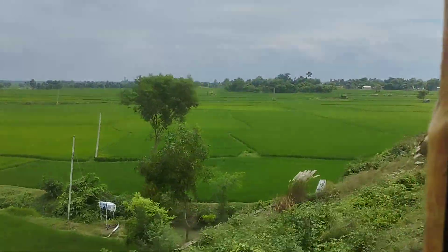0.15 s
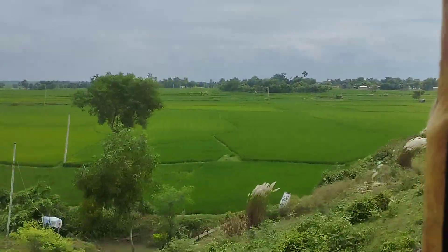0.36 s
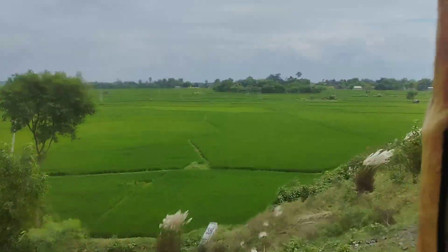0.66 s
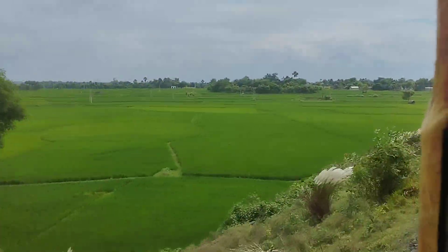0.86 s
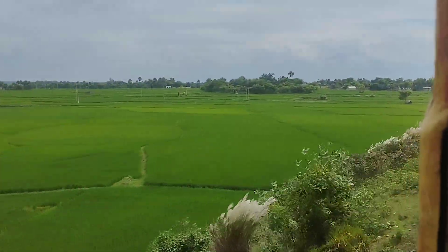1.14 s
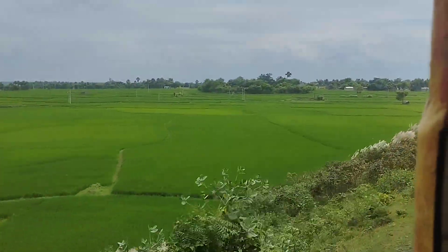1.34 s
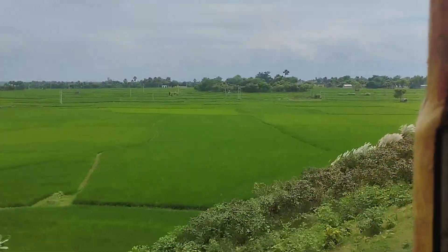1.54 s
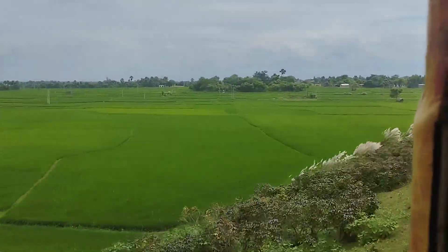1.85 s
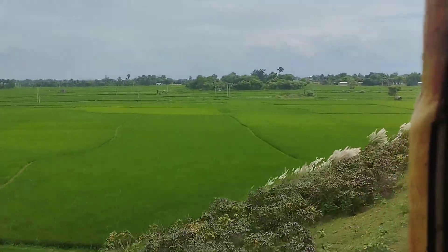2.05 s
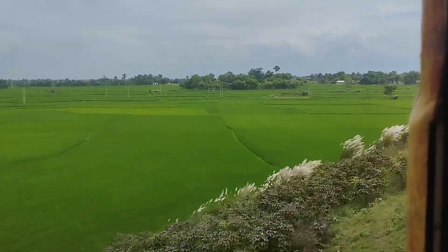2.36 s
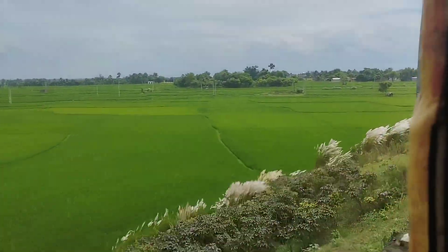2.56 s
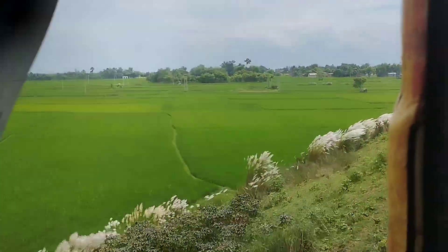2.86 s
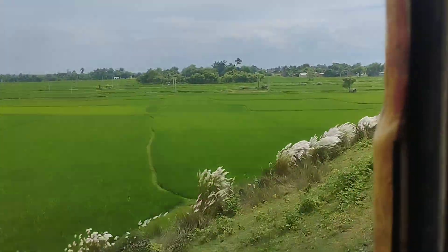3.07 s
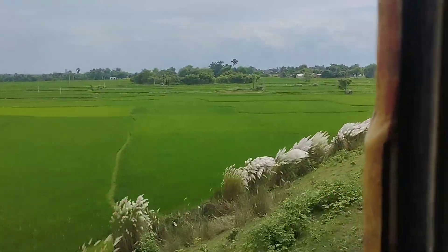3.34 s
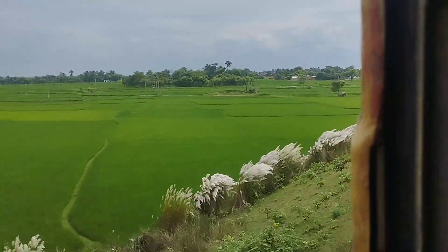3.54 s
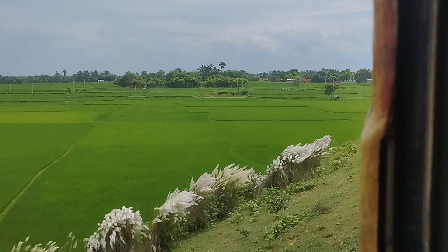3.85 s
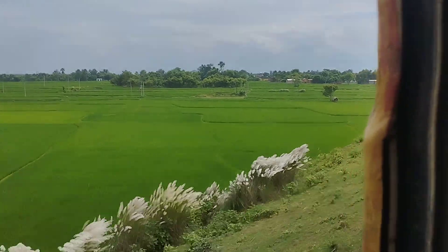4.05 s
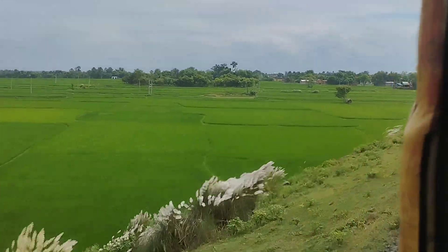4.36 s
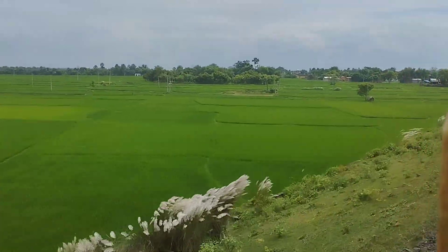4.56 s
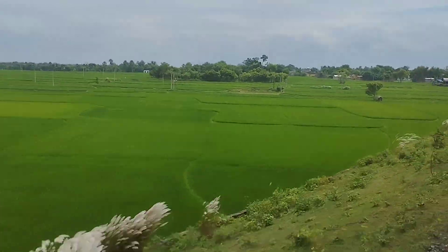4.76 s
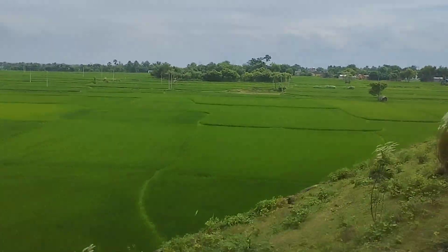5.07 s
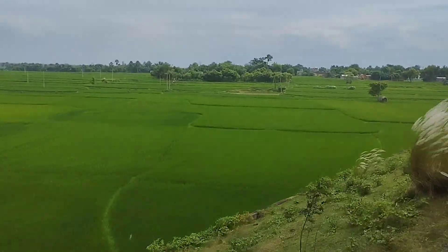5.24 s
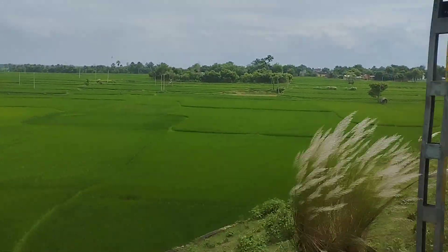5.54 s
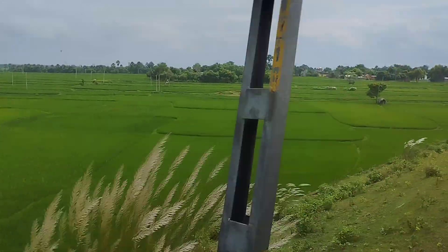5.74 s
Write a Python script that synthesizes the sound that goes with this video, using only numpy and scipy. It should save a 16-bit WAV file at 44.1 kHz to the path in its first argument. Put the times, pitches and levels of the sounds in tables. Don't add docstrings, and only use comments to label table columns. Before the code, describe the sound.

A close, clipped stereo capture of wind on a train passing green fields. Gusts flap and slam many times a second, harshest on the left with spitting bursts, milder buffeting on the right. Deep carriage throb and body rumble continue underneath, with a thin gear whine and rail hiss mostly buried. It starts abruptly at full strength, varies slightly, and never stops.

```python
import sys
import numpy as np
from scipy import signal
from scipy.fft import rfft, irfft, next_fast_len
from scipy.io import wavfile
from scipy.ndimage import uniform_filter1d, map_coordinates

SR = 44100
rng = np.random.default_rng(int(sys.argv[2]) if len(sys.argv) > 2 else 0)


def volts_from_decibels(level):
    exponent = np.asarray(level, float) / 20
    return 10 ** exponent


def transcribe(u):
    v = np.clip(np.atleast_2d(u).T, -1, 1)
    q = np.round(v * 32767).astype(np.int16)
    wavfile.write(sys.argv[1], SR, q)


N = 260278

# start_s, spit_db, fizz_re_spit_db, swell_db
EDDIES = [(0.063, -22.5, -31, -10), (0.134, -33.5, -33, -27), (0.167, -26, -34, -12.5),
          (0.229, -19, -26.5, -4), (0.288, -29, -28, -7.5), (0.343, -22.5, -22, -12.5),
          (0.379, -42, -25.5, -22.5), (0.403, -23.5, -28.5, -10.5), (0.453, -19, -25, -8.5),
          (0.508, -24.5, -34.5, -15.5), (0.558, -21, -27.5, -13.5), (0.603, -31, -31.5, -12),
          (0.62, -29.5, -30, -24), (0.667, -28.5, -32, -20), (0.726, -26.5, -28.5, -12.5),
          (0.793, -20, -33, -16), (0.841, -28, -24.5, -18.5), (0.883, -22, -30, -20),
          (0.915, -22, -26, -16), (1.028, -25.5, -35.5, -10.5), (1.083, -28, -33.5, -11),
          (1.127, -26, -25.5, -11.5), (1.185, -21, -18.5, -11), (1.207, -34, -37, -18),
          (1.243, -21.5, -24, -15), (1.302, -41, -36, -15), (1.396, -25, -33.5, -7),
          (1.45, -26, -31.0, -14.5), (1.508, -25, -30, -15), (1.573, -18.5, -11.5, -16.5),
          (1.632, -19.5, -21, -9), (1.679, -31.5, -35.0, -15), (1.732, -26, -29, -7),
          (1.787, -32, -35, -11.5), (1.853, -25.5, -37, -15.5), (1.914, -25.5, -33.5, -11),
          (1.968, -27.5, -38, -15), (1.997, -29.5, -26.5, -12.5),
          (2.027, -36.5, -34, -10.5), (2.112, -23.5, -29.5, -11.5), (2.145, -22.5, -26, -12.5),
                 (2.214, -35.5, -31.5, -18), (2.276, -34.5, -33, -10), (2.323, -16, -24, -12.5),
                 (2.374, -24, -18.5, -7.5), (2.419, -20.5, -27, -14.5), (2.45, -35.5, -31, -13.5),
                 (2.48, -34, -35.5, -9.5), (2.517, -34.5, -30.5, -10.5), (2.57, -29.5, -28.5, -13.5),
                 (2.611, -30.5, -24, -26), (2.645, -24.5, -33, -14.5), (2.71, -26, -30, -13.5),
                 (2.793, -38, -30.5, -21), (2.819, -20, -25.5, -16.5), (2.852, -36.5, -28.5, -18.5),
                 (2.895, -28.5, -28.0, -18.5), (2.923, -27.5, -37.5, -18), (3.062, -25, -40, -13.5),
                 (3.1, -28.5, -31.5, -10.5), (3.14, -38.5, -23.5, -16.5), (3.161, -20.5, -25.5, -11.5),
                 (3.224, -23.5, -31, -19), (3.27, -28.5, -27, -9), (3.295, -35.5, -32, -13),
                 (3.324, -32, -29, -21), (3.38, -32, -31.5, -19), (3.453, -22, -26, -18),
                 (3.475, -31.5, -32.5, -13), (3.503, -28.5, -26.5, -12), (3.523, -26.5, -25, -15.5),
                 (3.565, -24, -33, -14), (3.595, -27.5, -32, -8.5), (3.741, -28, -39.5, -22.5),
                 (3.84, -29, -31, -11.5), (3.892, -36.5, -35, -17), (3.949, -27.5, -40, -12),
                 (3.994, -35, -31, -16),
          (4.014, -41, -24.5, -18), (4.069, -31, -21.5, -21.5), (4.11, -32.5, -30.5, -15),
               (4.142, -26, -37.5, -9), (4.186, -28, -37, -16.5), (4.246, -21, -28, -19.5),
               (4.305, -23.5, -22, -12.5), (4.35, -19, -30, -16), (4.408, -23, -24.5, -20.5),
               (4.469, -29, -26, -16.5), (4.486, -35, -34.5, -25.5), (4.509, -31.5, -38, -15.5),
               (4.532, -36, -24.5, -20.5), (4.565, -23, -24.5, -15.5), (4.6, -28, -36, -13.5),
               (4.635, -28.5, -27.5, -11.5), (4.661, -29, -25.5, -14.5), (4.695, -28.5, -35, -12),
               (4.719, -40.5, -33.5, -17.5), (4.752, -33.5, -38, -10), (4.806, -27, -39.5, -7),
               (4.857, -35.0, -37, -12.5), (4.902, -28, -37.5, -16), (4.966, -24, -36, -9),
               (4.998, -30.5, -29.5, -11), (5.022, -40, -34.5, -24.5), (5.079, -37, -26.5, -18.5),
               (5.113, -28, -37.5, -15.5), (5.174, -22.5, -39.5, -15), (5.229, -28.5, -32, -17.5),
               (5.329, -23.5, -24.5, -12), (5.357, -35.5, -32, -10), (5.417, -36.5, -32.5, -14.5),
               (5.449, -28.5, -37, -12.5), (5.513, -24.5, -25.5, -9), (5.546, -33, -30, -12.5),
               (5.58, -26, -26.5, -20), (5.634, -25, -31.5, -9.5), (5.695, -27.5, -38.5, -11.5),
               (5.747, -36.5, -38.5, -16.5), (5.769, -34.5, -40, -13), (5.826, -43, -25, -13.5),
          (0.948, -29, -28, -12.5), (0.985, -32.5, -35, -14), (2.263, -31, -27.5, -12),
                 (2.724, -28.5, -32.5, -10), (2.743, -31, -29.5, -13), (2.763, -29, -31, -16),
                 (3.118, -29, -30.5, -14), (4.159, -33.5, -31.5, -19.5), (4.199, -27, -36.5, -8),
                 (4.373, -24.5, -27, -19), (4.428, -27.5, -24, -13.5), (4.941, -30.5, -34.5, -11.5),
                 (5.191, -27, -31, -9)]
# start_s, peak_db
SNAPS = [(0.0553, -11.5), (0.218, -15.5), (0.2267, -11), (0.2803, -17), (0.3396, -16), (0.3966, -12),
         (0.4463, -12.5), (0.5007, -13), (0.5521, -9), (0.6614, -15.5), (0.7255, -15.5),
         (0.7881, -15.5), (0.7894, -11.5), (0.837, -17), (0.8804, -6.5), (0.9133, -10),
         (1.026, -16.5), (1.0517, -16), (1.1277, -10), (1.1784, -9), (1.2425, -11), (1.296, -21),
         (1.3019, -16), (1.4294, -18), (1.4483, -9.5), (1.505, -13.5), (1.5698, -12.5),
         (1.6252, -13.5), (1.6782, -15), (1.727, -19), (1.727, -13), (1.7848, -16.5), (1.8505, -14.5),
         (1.9624, -17.5), (1.9924, -12), (2.0278, -16), (2.1083, -14.5), (2.2115, -15),
         (2.2593, -19.5), (2.2618, -15), (2.321, -11.5), (2.364, -14.5), (2.3905, -20), (2.4174, -11),
         (2.4503, -14), (2.5184, -15.5), (2.5706, -8.5), (2.6083, -17.5), (2.6387, -14),
         (2.7018, -12.5), (2.816, -11), (2.8499, -12.5), (2.8953, -18), (2.9188, -15),
         (3.0522, -16), (3.0617, -16), (3.0986, -10), (3.137, -16.5), (3.1597, -8), (3.2223, -17.5),
              (3.2617, -16), (3.272, -7), (3.2922, -12), (3.3435, -19), (3.4473, -15), (3.4927, -15.5),
              (3.52, -13), (3.5655, -14), (3.6409, -18), (3.6605, -18), (3.7382, -16), (3.9364, -15.5),
              (3.9457, -14), (3.9882, -15), (4.012, -21), (4.0243, -16), (4.0499, -17), (4.1402, -15),
              (4.142, -13.5), (4.1846, -13), (4.1966, -13.5), (4.2295, -18), (4.242, -13), (4.301, -16),
              (4.302, -13), (4.3448, -13), (4.4022, -15), (4.4637, -15), (4.4845, -14.5), (4.5009, -14),
              (4.5593, -14.5), (4.5633, -15), (4.6326, -16), (4.6578, -13), (4.7434, -15.5), (4.8037, -18),
              (4.8554, -17.5), (4.9015, -11.5), (4.9274, -15), (4.9883, -14.5), (5.1115, -24.5),
              (5.1115, -16.5), (5.1726, -8.5), (5.1896, -11), (5.228, -15), (5.3288, -10), (5.4094, -19),
              (5.531, -14.5), (5.5637, -17.5), (5.631, -14.5), (5.7392, -18), (5.7675, -14)]
# time_s, level_db
GUSTS = [(0.0, -5), (0.07, -9), (1.15, -7.5), (1.35, -8), (1.97, -12), (2.71, -6), (2.95, -10.5),
         (3.01, -9), (3.07, -8.5), (3.59, -9), (3.69, -8), (4.27, -7.5), (4.77, -7), (4.85, -9.5),
         (4.91, -6.5), (5.29, -10), (5.55, -7.5), (5.9, -10)]
# centre_s, gain_db, width_s
LULLS = [(0.031, -18.5, 0.022), (1.32, -3.5, 0.026), (1.94, -4, 0.014), (2.05, -4, 0.021),
         (2.2, -7.5, 0.015), (2.35, -10, 0.0051), (2.681, -7.5, 0.025), (2.97, -5.5, 0.021),
         (3.64, -6.5, 0.031), (3.78, -5, 0.026), (4.11, -11.5, 0.029), (5.27, 3.5, 0.018),
         (5.39, -14, 0.02)]
# time_s, level_db
THROB_LEVELS = [(0.0, -14), (0.09, -7.5), (1.25, -10.5), (1.95, -8.5), (2.73, -9), (2.85, -26.5),
                (3.07, -5), (3.55, -22), (3.69, -16), (3.97, -13), (4.09, -19), (4.29, -11.5), (4.69, -20),
                (4.93, -10.5), (5.53, -8), (5.63, -19.5), (5.77, -10), (5.9, -12)]
# time_s, level_db
RAIL_LEVELS = [
    (0, -29),
    (.7, -30),
    (1.1, -28),
    (1.6, -30.5),
    (2.35, -36),
    (2.6, -33),
    (3.9, -32.5),
    (4.5, -34.5),
    (5.9, -33),
]
# start_s, drop_db
DUCKS = [(0.246, -3.5), (0.439, -1), (0.66, -4), (1.118, -5), (1.627, -0.5), (1.798, -3), (2.131, -2.5),
         (2.695, -8), (3.05, -3), (3.158, -5.5), (3.645, -4), (4.16, -3.5), (4.36, -2.5), (4.42, -2),
         (4.582, -3), (4.97, -4), (5.33, 0), (5.506, -5), (5.58, -3.5)]
# freq_hz, density_db_per_hz
HEAVE_SPECTRUM = [(3, -14.5), (12, -10.5), (25, -12), (45, -1.5), (90, 0.5), (200, -7), (400, -17.5),
                  (800, -43), (1600, -51.5), (4000, -60), (9000, -99.5)]
FLUTTER_SPECTRUM = [(60, -19), (150, 2.5), (300, 1.5), (600, -8), (1200, -22.5), (2500, -49), (5000, -49),
                    (9000, -73)]
SPIT_SPECTRUM = [(200, -7.5), (600, 5), (1500, -8.5), (3000, -19), (5000, -23.5), (8000, -38.5),
                 (16000, -46.5)]
RUMBLE_SPECTRUM = [(8, -23.5), (20, 5.5), (35, -5.5), (70, -5), (110, -3), (200, -32), (400, -56.5)]
SHELTERED_SPECTRUM = [(3, -16), (12, -1.5), (50, -1), (130, -7.5), (300, -11), (600, -21.5), (1200, -32.5),
                      (3000, -51.5), (9000, -87)]
ROLLING_SPECTRUM = [(200, -16), (600, -1), (1300, -4.5), (2000, -3.5), (3200, -6), (4200, -14.5),
                    (5500, -19.5), (6500, -20), (7500, -27), (9000, -36)]
FIZZ_SPECTRUM = [(7000, -30.5), (8300, -16.5), (9500, -2.5), (11000, -12.5), (12000, -1.5), (13500, 1.5),
                 (15700, -1)]
# multiple, level_db
WHINE_PARTIALS = [(1, -38), (2, -43), (3, -45), (4, -53), (5, -52), (6, -54), (7, -55), (8, -57), (9, -50),
                  (10, -53), (11, -60)]
# freq_hz, gain_db
PORT_RESPONSE = [(3000, 4), (4500, -0.5), (6000, -3), (7000, -5.5), (8300, -19.5), (9500, -20),
                 (11000, -24), (13000, -24.5)]
# freq_hz, share_of_band_rms
LINE_THRESHOLD = [(800, .05), (1500, .35), (4000, .65), (7000, 1), (9000, 1.3), (13000, 1.05), (15800, 1.2)]
# freq_hz, threshold_in_level_spreads
BAND_THRESHOLD_LEFT = [(1000, -3.5), (6500, -2.8), (8200, -1), (9500, -1.6), (11000, -.7), (12500, -2.1),
                       (14800, -2.1), (15700, -.3)]
BAND_THRESHOLD_RIGHT = [(1000, -3.5), (6500, -2.8), (7800, 1), (9500, .7), (11000, 1.6), (13000, .9),
                        (14000, -.2), (15700, .4)]

T_S = np.arange(N) / SR


def unit(x):
    return x / np.sqrt(np.mean(x ** 2) + 1e-20)


def along(points, hz):
    point_hz, value = np.transpose(points)
    return np.interp(np.log(hz + 1), np.log(point_hz + 1), value)


def curve(points):
    time_s, value = np.transpose(points)
    return np.interp(T_S, time_s, value)


def wobble(rate_hz):
    knots = rng.standard_normal(int(N * 500 / SR))
    return map_coordinates(knots, [np.arange(N) * rate_hz / SR])


def filtered(x, response):
    size = next_fast_len(N + SR)
    gain = response(np.fft.rfftfreq(size, 1 / SR))
    return irfft(rfft(x, size) * gain, size)[..., :N]


def rush(spectrum, patchy_db):
    z = signal.stft(rng.standard_normal(N), nperseg=512)[2]
    field = uniform_filter1d(rng.standard_normal(z.shape), 6, 0)
    field = uniform_filter1d(field, 8, 1)
    patchy = signal.istft(z * volts_from_decibels(patchy_db * unit(field)), nperseg=512)[1][:N]
    return unit(filtered(patchy, lambda hz: volts_from_decibels(along(spectrum, hz))))


def eddies():
    return np.transpose(EDDIES)


def at_eddies(sizes, width_s, shape=lambda u: 1):
    spikes = np.bincount((eddies()[0] * SR).astype(int), sizes, N)[:N]
    u = np.arange(-SR // 10, SR // 10 + 1) / SR / width_s
    return signal.fftconvolve(spikes, shape(u) * np.exp(-u * u / 2), "same")


def gust_db():
    mean_db = -8.5
    return curve(GUSTS) - mean_db


def windward():
    bias = 0.071
    _, spit_db, _, swell_db = eddies()
    strength = np.clip((spit_db + 37.5) / 16, 0, None)

    crossing = np.exp(-1.5 * at_eddies(strength, width_s=0.0021))
    heave = crossing * volts_from_decibels(-1.0 + 1.3 * wobble(8.3)) * rush(HEAVE_SPECTRUM, patchy_db=2.0)

    swell = at_eddies(volts_from_decibels(1.96 * (np.minimum(swell_db, -10.5) + 14.5) - 9.0), width_s=0.0057)
    swell = swell + volts_from_decibels(2.835 * gust_db() - 9.11)
    lull_db = sum(db * np.exp(-((T_S - s) / width_s) ** 2) for s, db, width_s in LULLS)
    flutter_db = lull_db + 3.43 * wobble(70) + 2.03 * wobble(190)
    flutter = swell * volts_from_decibels(flutter_db) * rush(FLUTTER_SPECTRUM, patchy_db=1.5)

    front = 0.5 * at_eddies(strength, width_s=0.0039, shape=lambda u: u)
    burst = at_eddies(volts_from_decibels(spit_db + 17.5), width_s=0.0008)
    wake = at_eddies(volts_from_decibels(spit_db - 3.5), width_s=0.014) * volts_from_decibels(18.4 * np.tanh(0.95 * wobble(300)))
    spit = (burst + wake) * rush(SPIT_SPECTRUM, patchy_db=-1.0)

    opening = 3 * np.exp(-(T_S / 0.0006) ** 2)
    opening = opening - 2.5 * np.exp(-((T_S - 0.0022) / 0.0012) ** 2)
    return bias + opening + heave + flutter + front + spit


def throb():
    resonance_hz, width_hz = 18.5, 5.5
    pushes = at_eddies(volts_from_decibels(0.5 * (eddies()[1] + 32)), width_s=0.005)
    drive = unit(pushes) + 0.6 * wobble(60)
    swing = filtered(drive, lambda hz: np.exp(-((hz - resonance_hz) / width_hz) ** 2))
    envelope = np.abs(signal.hilbert(swing, next_fast_len(N))[:N])
    steady = swing / (envelope + 0.47 * np.std(swing))
    return -volts_from_decibels(curve(THROB_LEVELS) - 5.0) * unit(steady)


def rumble():
    return volts_from_decibels(-20.5 + 3.1 * wobble(7.7)) * rush(RUMBLE_SPECTRUM, patchy_db=0.5)


def sheltered():
    level_db, lead_s, width_s, growth = -10.5, 0.048, 0.026, 0.47
    swell_db = sum(-db * np.exp(-((T_S - s + lead_s) / width_s) ** 2) for s, db in DUCKS)
    lump_db = 1.5 * wobble(14) + 2.2 * wobble(45)
    lumps = unit(volts_from_decibels(lump_db) * rush(SHELTERED_SPECTRUM, patchy_db=1.5))
    skewed = lumps - 0.14 * (lumps ** 2 - 1)
    return volts_from_decibels(level_db + growth * swell_db) * unit(skewed)


def rolling():
    whine_hz = 345.4
    port_db = [[-8], [0]]
    warped_s = np.cumsum(1 + 0.003 * wobble(6)) / SR
    whine = sum(volts_from_decibels(db + 34.0 + 0.57 * wobble(4.5)) * np.sin(2 * np.pi * k * whine_hz * warped_s)
                for k, db in WHINE_PARTIALS)
    hiss = np.array([volts_from_decibels(1.5 * wobble(14)) * rush(ROLLING_SPECTRUM, patchy_db=2.0) for _ in range(2)])
    return volts_from_decibels(curve(RAIL_LEVELS) + 3.0) * volts_from_decibels(port_db) * (hiss + whine)


def fizz(steepness):
    pilot_hz = 13902
    _, spit_db, fizz_db, _ = eddies()
    settling_db = 5.1 * np.exp(-T_S / 1.2)
    flares = at_eddies(volts_from_decibels(spit_db + fizz_db - 6.0), width_s=0.0015)
    left_db = -51.5 + settling_db + 0.8 * gust_db() + 2.0 * wobble(60)
    left = volts_from_decibels(left_db) * (0.23 + 0.31 * steepness) + flares
    ducked_rush_db = curve(RAIL_LEVELS) + 37.5 + 20 * np.log10(gain_control()[1])
    right = volts_from_decibels(-65.5 + settling_db + 0.8 * ducked_rush_db + 1.5 * wobble(20))
    pilot_db = -85 + 8 * np.exp(-T_S / 1.3) + 3 * wobble(12)
    pilot = volts_from_decibels(pilot_db) * np.sin(2 * np.pi * pilot_hz * T_S)
    left_hiss = left * rush(FIZZ_SPECTRUM, patchy_db=-0.5)
    right_hiss = right * rush(FIZZ_SPECTRUM, patchy_db=-1.0)
    return np.array([left_hiss, right_hiss]) + pilot


def snaps():
    rise_s, fall_s = 0.0003, 0.004
    start_s, peak_db = np.transpose(SNAPS)
    t_s = np.arange(SR // 25) / SR
    shape = (1 - np.exp(-t_s / rise_s)) * np.exp(-t_s / fall_s)
    fronts = np.bincount((start_s * SR).astype(int), volts_from_decibels(peak_db), N)[:N]
    return signal.fftconvolve(fronts, shape)[:N] * rush(SPIT_SPECTRUM, patchy_db=3.5)


def eddy_bursts():
    envelope = at_eddies(volts_from_decibels(eddies()[1] + 5.0), width_s=0.0024) * volts_from_decibels(1.1 * wobble(430))
    bursts = envelope * rush(SPIT_SPECTRUM, patchy_db=2.5)
    return (bursts + snaps()) * [[1], [0]]


def gain_control():
    recovery_s = 0.19
    duck_db = sum(db * (T_S > s) * np.exp(-np.abs(T_S - s) / recovery_s) for s, db in DUCKS)
    return volts_from_decibels([0 * T_S, uniform_filter1d(duck_db, size=260)])


def thinned(x):
    sparse_until_s, sparse_extra = 1.3, 0.75
    frame = dict(window="cosine", nperseg=2048, noverlap=1024)
    hz, t_s, z = signal.stft(x, SR, **frame)
    power = np.abs(z[:, :1024]) ** 2
    band = power.reshape(2, 32, 32, -1).mean(axis=2)
    sparse = uniform_filter1d(rng.standard_normal(band[:, :1].shape), size=3, axis=2)
    sparse = sparse + sparse_extra * (t_s < sparse_until_s)

    level = np.log(band + 1e-20)
    level = level - level.mean(axis=2, keepdims=True)
    level = level + uniform_filter1d(rng.standard_normal(band.shape), size=2, axis=2) - 0.5 * sparse
    band_hz = hz[16::32]
    threshold = np.array([along(BAND_THRESHOLD_LEFT, band_hz), along(BAND_THRESHOLD_RIGHT, band_hz)])[..., None]
    heard = level > threshold * level.std(axis=2, keepdims=True)

    cut = along(LINE_THRESHOLD, hz[:1024])[:, None] * np.clip(0.7 + 0.8 * sparse, 0.2, 1.5)
    strong = power > cut ** 2 * np.repeat(band, 32, axis=1)
    keep = np.repeat(heard, 32, axis=1) & strong
    keep = np.pad(keep, [(0, 0), (0, 1), (0, 0)])
    return signal.istft(z * keep, SR, **frame)[1][:, :N]


def scene():
    shared_db = [[5], [0]]
    shared = throb() + rumble()
    wind = np.array([windward(), sheltered()])
    return wind + volts_from_decibels(shared_db) * shared + rolling()


def top_cut(x):
    return signal.sosfilt(signal.butter(12, 15800, fs=SR, output="sos"), x)


def record(dry):
    ceiling, hardness = np.array([[0.89], [0.95]]), np.array([[14], [5]])
    leak_db, leak_hz = -13, 604
    rail, top_hz = 0.94, 15800
    ducked = dry * gain_control()
    flat = ducked / (1 + np.abs(ducked / ceiling) ** hardness) ** (1 / hardness)
    ripple = volts_from_decibels(leak_db) * filtered(ducked - flat, lambda hz: hz ** 2 / (hz ** 2 + leak_hz ** 2))
    clipped = np.clip(flat + ripple + eddy_bursts(), -rail, rail)
    coloured = filtered(clipped, lambda hz: volts_from_decibels(along(PORT_RESPONSE, hz) - PORT_RESPONSE[0][1]))
    steepness = unit(uniform_filter1d(np.abs(np.gradient(flat[0])), size=40))
    limited = filtered(coloured + fizz(steepness), lambda hz: hz < top_hz)
    return top_cut(thinned(limited))


dry = scene()
out = record(dry)
transcribe(out)
```